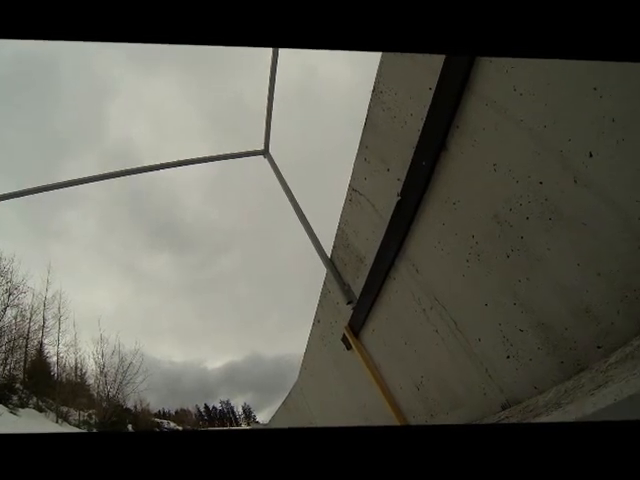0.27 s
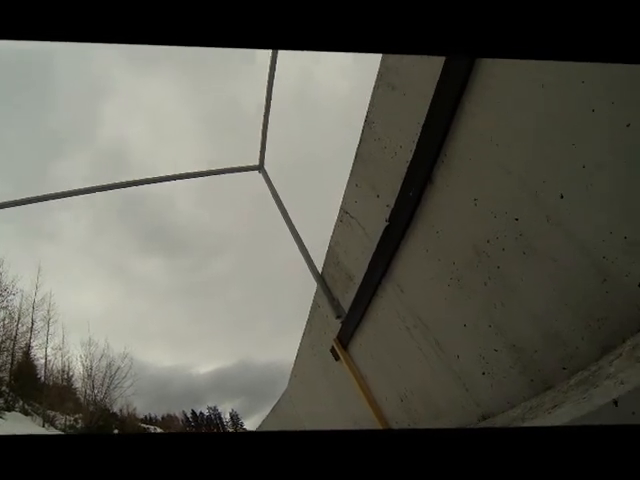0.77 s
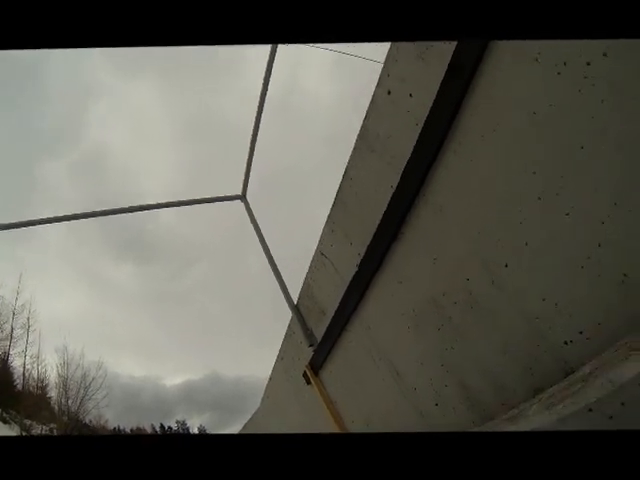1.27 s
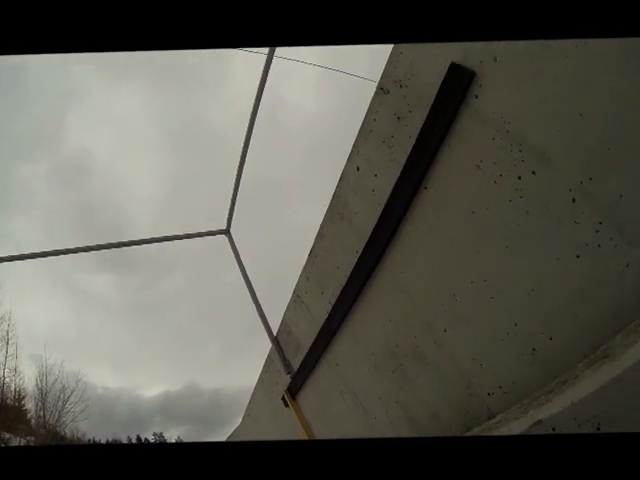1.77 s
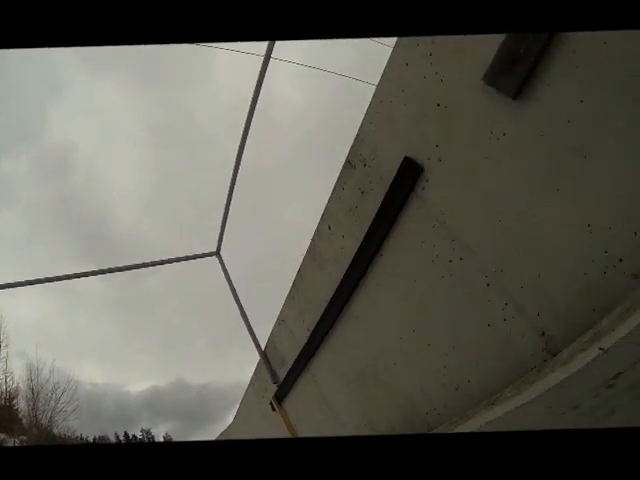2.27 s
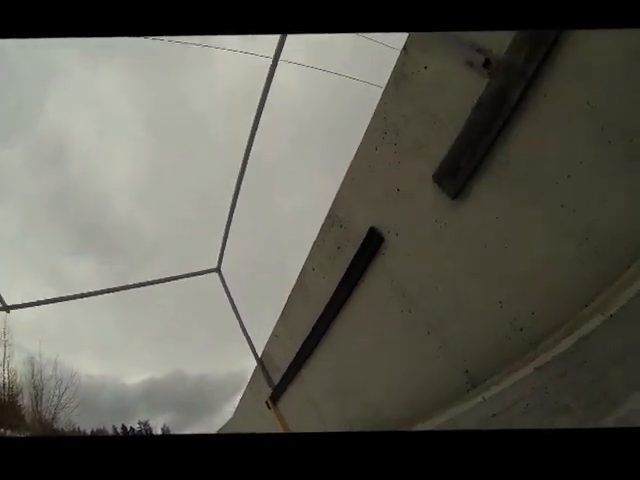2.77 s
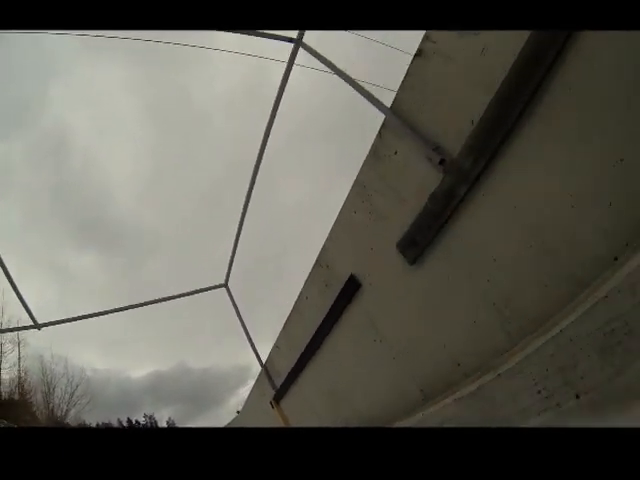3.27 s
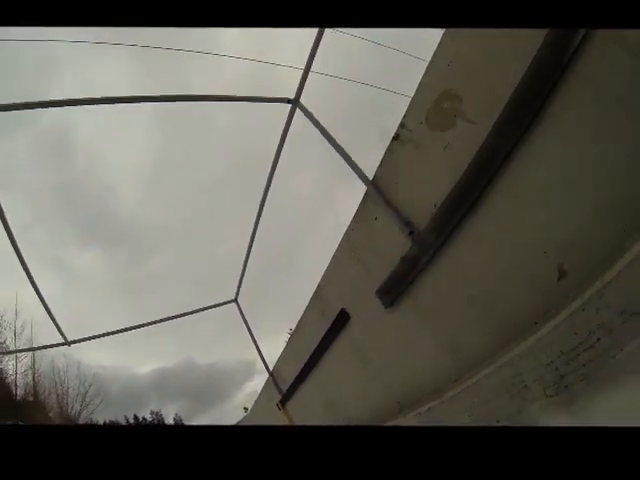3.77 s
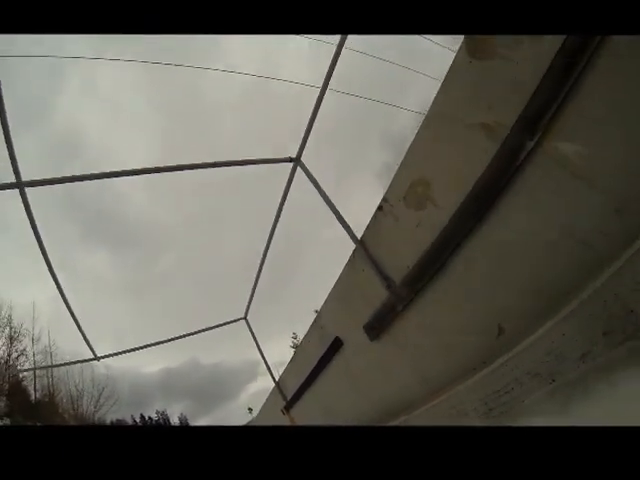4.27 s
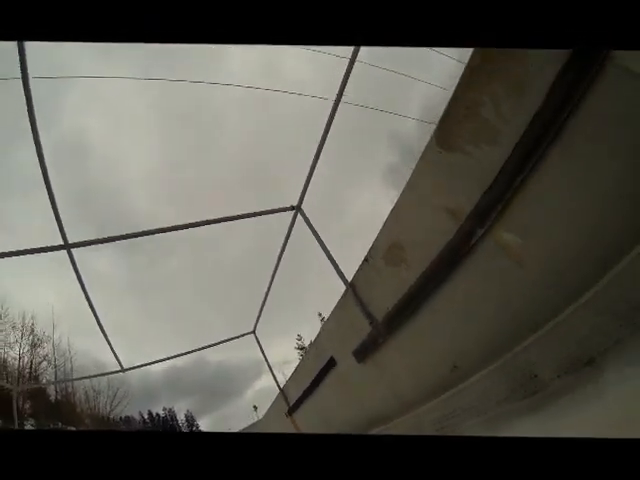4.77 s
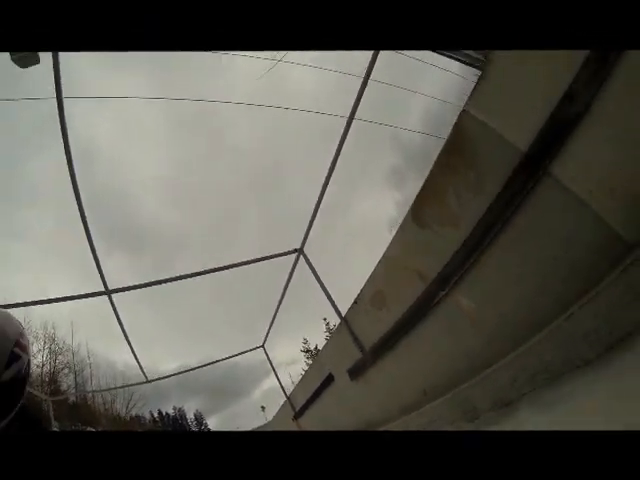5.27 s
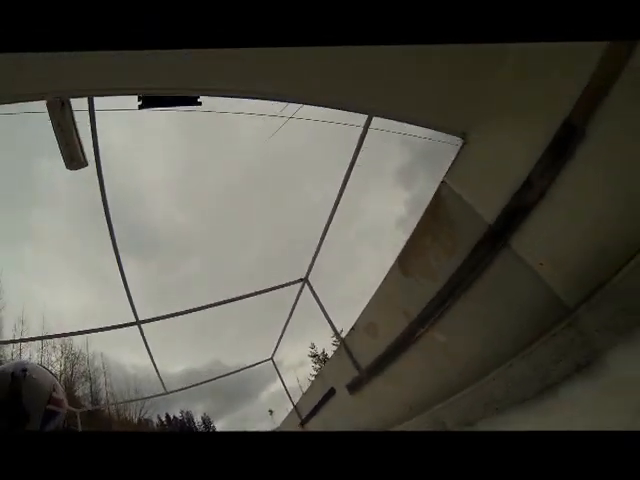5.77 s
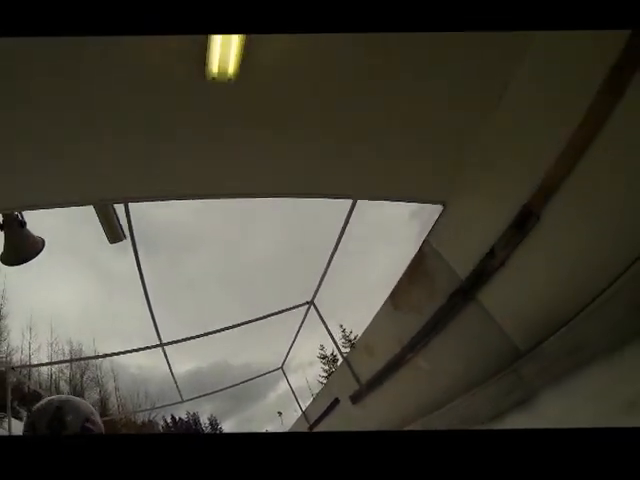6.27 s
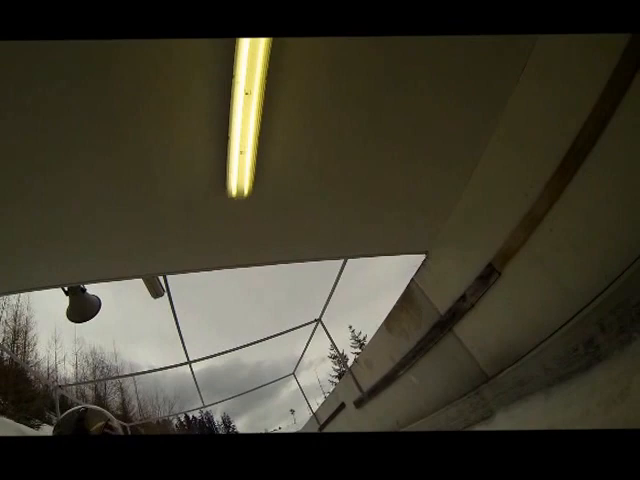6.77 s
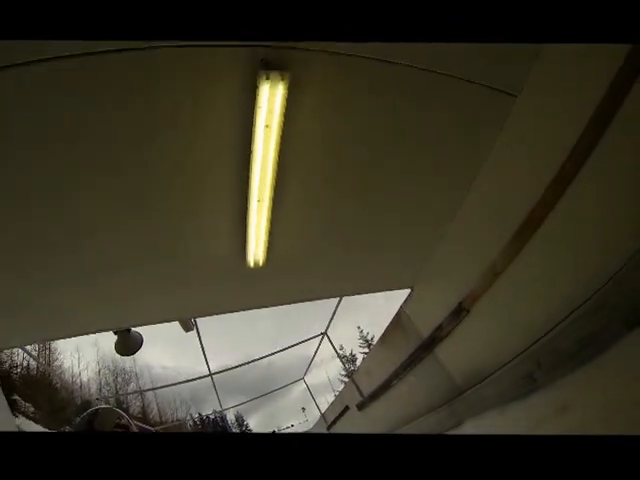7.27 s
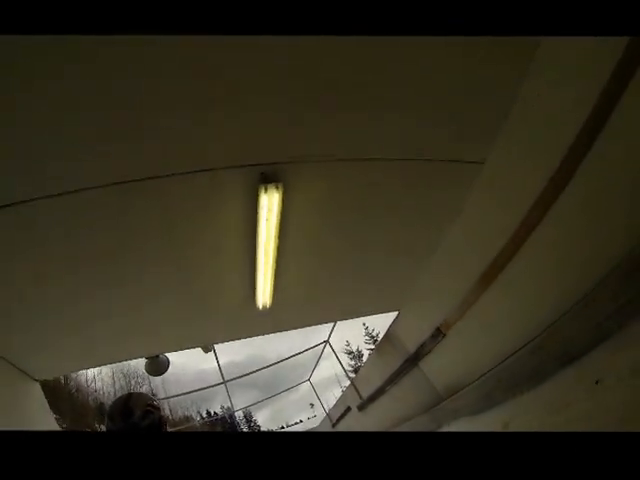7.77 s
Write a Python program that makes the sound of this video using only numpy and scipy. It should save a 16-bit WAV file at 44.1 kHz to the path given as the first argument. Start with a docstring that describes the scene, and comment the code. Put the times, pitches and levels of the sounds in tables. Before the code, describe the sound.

A bobsleigh runs down an ice track, heard from a microphone fixed to the sled. A deep shudder and uneven wind buffeting continue throughout, while rough ice makes the hull drum in quick surges and bumps land as booming thuds. Loose fittings knock irregularly, hardest about a second in and again near the end. Underneath, the steel runners grind and skid quietly, with a few very brief squeals.

```python
"""Riding a bobsleigh

The run down an ice track, heard from a camera fixed to the sled. The chassis shudders, rough
patches and bumps in the ice drum and boom through the hull, and the steel runners grind, skid and
squeal. Loose fittings knock and tick; wind buffets the microphone and whistles thinly past an edge."""
import sys
import numpy as np
from scipy import signal
from scipy.fft import rfft, irfft
from scipy.io import wavfile
from scipy.ndimage import uniform_filter1d

SR = 44100
rng = np.random.default_rng(int(sys.argv[2]) if len(sys.argv) > 2 else 0)


def unload_wav(signal):
    """Save mono or channel-first audio to the path in sys.argv[1] as 16-bit WAV at rate SR, clipped to [-1, 1]."""
    wavfile.write(
        sys.argv[1],
        SR,
        np.round(np.clip(np.atleast_2d(signal).T, -1, 1) * 32767).astype(np.int16),
    )


N = 354255
T = np.arange(N) / SR


def undb(db):
    """Decibels to gain."""
    return 10 ** (np.asarray(db) / 20)


def unit(x):
    """Scale to rms 1."""
    return x / np.sqrt(np.mean(x ** 2))


def even(x, span_s):
    """Hold the short-term rms of x near 1."""
    return x / np.sqrt(uniform_filter1d(x ** 2, int(span_s * SR)) + 1e-12)


def burst(x, db):
    """Scale a short sound so that its energy, spread over 10 ms, has level db."""
    return undb(db) * x / np.sqrt(np.sum(x ** 2) / (SR / 100) + 1e-18)


def add(out, x, start):
    """Mix x in from start, in seconds."""
    i = int(start * SR)
    a, b = max(i, 0), min(i + len(x), N)
    out[a:b] += x[a - i:b - i]


def fader(points):
    """Gain gliding through (seconds, dB) points."""
    times, db = np.transpose(points)
    return undb(np.interp(T, times, db))


def spells(rows, attack_s, release_s, slope_db=0):
    """Gain of (start, length, dB) rows: each rises, holds while changing by slope_db, and dies away."""
    power, t = np.zeros(N), T[:SR]
    for start, length, db in rows:
        attack = np.minimum(t / attack_s, 1)
        hold = undb(db + slope_db * (np.minimum(t / length, 1) - 0.5))
        release = np.exp(-np.maximum(t - length, 0) / release_s)
        add(power, (attack * hold * release) ** 2, start)
    return np.sqrt(power)


def response(spectrum, resonances=(), bright_db=0, size=8192):
    """Causal impulse response of a spectrum with resonances and a treble shelf."""
    f = np.maximum(np.arange(size // 2 + 1) * SR / size, 1)
    hz, db = np.transpose(spectrum)
    shelf = bright_db * f ** 4 / (f ** 4 + 2100. ** 4)
    db = np.interp(np.log(f), np.log(hz), db) + shelf
    for centre, width, lift in resonances:
        db = db + lift / (1 + (2 * (f - centre) / width) ** 2)
    cepstrum = irfft(np.log(undb(db)))
    cepstrum[1:size // 2] *= 2  # fold to minimum phase
    cepstrum[size // 2 + 1:] = 0
    return irfft(np.exp(rfft(cepstrum)))


def through(x, impulse):
    """Pass x through an impulse response."""
    return signal.fftconvolve(x, impulse)[:len(x)]


def noise_band(hz, width_hz, steady):
    """Noise around one pitch; steady (0-1) evens out its swells."""
    f = np.fft.fftfreq(N, 1 / SR)
    band = np.fft.ifft(np.fft.fft(rng.standard_normal(N)) / (1 + ((f - hz) / width_hz) ** 2) ** 2)
    swell = abs(band) / np.mean(abs(band))
    return unit(band.real / (swell ** 2 + 0.1) ** (steady / 2))


def wander(per_s):
    """A glide between random values, per_s of them a second, at rms 1."""
    step = max(int(SR / per_s), 1)
    held = np.repeat(rng.standard_normal(N // step + 1), step)
    return unit(uniform_filter1d(held, step)[:N])


def grains(per_s, spread_db):
    """Random clicks, a few much larger than the rest."""
    size = undb(spread_db * np.minimum(rng.exponential(size=N), 4))
    return (rng.random(N) < per_s / SR) * size * rng.choice([-1, 1], N)


# Spells of thin whistle. Each row: start in seconds, length in seconds, level in dB.
WHISTLE_SPELLS = [(-.1, 0.81, -78.5), (1.75, .57, -82), (3.22, 0.41, -77.5), (4.35, .12, -80),
                  (5.85, 0.33, -85.5), (6.35, .25, -78)]

def wind_whistle():
    """Air sings past a small edge, in spells over a faint trace that never stops."""
    blowing = np.hypot(undb(-88.5), spells(WHISTLE_SPELLS, attack_s=0.12, release_s=0.04))
    return undb(1.5) * noise_band(10670, width_hz=100, steady=0.3) * blowing


def wind_buffet():
    """Wind beats on the microphone with a deep, uneven flutter."""
    return undb(-25.5) * noise_band(30, width_hz=40, steady=0) * undb(2 * wander(4.3))


# The crisp tone of a crackle. Each row: frequency in Hz, level in dB.
CRACKLE_EQ = [(2000, -34), (4500, -17), (6200, 0), (8500, -9.5), (10000, -12), (12500, -7.5), (15000, -32)]
# Showers of crackles. Each row: start in seconds, length in seconds, level in dB.
CRACKLE_SHOWERS = [(.98, .11, -61.5), (1.12, 0.084, -63.5), (5.38, 0.017, -56), (6.872, 0.01, -58.5),
                   (7.44, 0.0094, -55), (7.565, 0.047, -61)]

def crackles():
    """Showers of tiny, bright clicks."""
    clicks = through(grains(per_s=360, spread_db=3.5), response(CRACKLE_EQ))
    return even(clicks, span_s=0.02) * spells(CRACKLE_SHOWERS, attack_s=0.002, release_s=0.002)


# Resonances of the shell and camera housing. Each row: centre in Hz, width in Hz, boost or cut in dB.
SHELL_RESONANCES = [(646, 88, 6), (800, 110, 10), (1050, 42, 4.5), (1320, 120, 4.5), (1485, 37, 4),
                    (1570, 19, 3), (1692, 260, 6), (2770, 120, -1), (2590, 64, 2.5), (3110, 64, -2.5),
                    (3540, 100, 3.5), (4480, 650, 1.5), (5130, 1300, 4.5), (6740, 300, -2), (7940, 2200, 5)]

def shell(x, eq, bright_db=0):
    """A contact with its own tone, eq, is coloured by the shell and housing."""
    return through(x, response(eq, SHELL_RESONANCES, bright_db))


def panel_ring(x, ring_s=0.009, ring_db=-7):
    """The shell's many small modes add a short, grainy ring."""
    t = T[:SR // 10]
    tail = rng.standard_normal(len(t)) * np.exp(-t / ring_s)
    return x + undb(ring_db) * through(x, tail / np.sqrt(np.sum(tail ** 2)))


# The dry tone of the camera mount. Each row: frequency in Hz, level in dB.
MOUNT_EQ = [(400, -4.5), (1200, -0.5), (2600, 2), (4000, -2.5), (6000, -5.5), (8000, -15), (12000, -19.5),
            (15000, -27)]

def mount_chafing(swing, rough, slack=0.42):
    """The mount chafes at the crests of the hull's widest swings and ticks more often on rough ice."""
    pressure = np.clip(abs(swing) - slack, 0, slack)
    rub = unit(grains(per_s=5500, spread_db=3)) * pressure
    rub *= undb(4 * np.clip(wander(97), -2, 2))
    shake = rough / np.mean(rough)
    ticks = unit(grains(per_s=45 * shake, spread_db=3.6))
    return undb(-64) * unit(shell(rub, MOUNT_EQ)) + undb(-70) * unit(shell(ticks, MOUNT_EQ))


def faint_knocks(count=120, per_s=8.3, db=-47.5, spread_db=6.5, contact_ms=3.3):
    """Faint knocks at random moments, as rows like those of the loud ones."""
    waits, sizes, lengths = rng.random((count, 3)).T
    starts = np.cumsum(-np.log(1 - waits) / per_s)
    return [(start, db + spread_db * (2 * size - 1), contact_ms * (0.5 + length), 0)
            for start, size, length in zip(starts, sizes, lengths) if start < T[-1]]


# The thick tone of a knock. Each row: frequency in Hz, level in dB.
KNOCK_EQ = [(100, 14), (400, -4.5), (650, -8), (1100, -2.5), (1600, 3.5), (2100, -9), (2700, -5),
            (4000, -22), (6000, -37), (9000, -47.5), (15000, -62.5)]
# Loud knocks, with two brief runner scrapes (4.36 s and 6.21 s) among them. Each row: start in seconds, level
# over 10 ms in dB, contact time in ms, brightness in dB.
LOUD_KNOCKS = [(0.028, -33.5, 1.7, 1), (.23, -35.5, 5.2, -4), (.275, -23.5, 6.7, 1.5),
               (0.337, -33, 6.5, -2), (0.404, -33, 7.4, -4), (.432, -33, 10.4, 15), (0.697, -29.5, 4.6, 1),
               (1.0292, -15.5, 2, 25.5), (1.032, -20, 1.2, -2), (1.126, -26.5, 9, -11.5),
               (1.745, -33.5, 8.1, -11), (1.962, -25, 6.6, -0.5), (2.047, -35.5, 7.1, 1),
               (2.086, -29, 13, -2.5), (2.328, -35, 5, 0), (2.351, -25, 5.9, -12), (2.654, -36.5, 2.6, -3),
               (2.706, -39, 2.8, 7), (3.11, -23.5, 8.1, -7), (3.5, -35.5, 18, 17), (3.613, -32.5, 5.8, -3),
               (3.914, -36.5, 1.5, 14.5), (4.141, -31.5, 2.3, -7.5), (4.16, -37, 3.2, 2),
               (4.36, -38, 11, 10), (4.866, -42, 5.7, 12), (5.349, -23.5, 3.8, -24),
               (5.372, -20.5, 4.7, 3.5), (5.379, -22.5, 4.5, 4), (5.807, -39.5, 1.4, 2),
               (5.88, -35.5, 4.1, 0), (5.915, -27, 4, 5.5), (6.183, -35.5, 3, -9),
               (6.209, -27.5, 15.6, -10), (6.367, -46, 4.4, -4), (6.473, -35, 7.7, 18),
               (6.618, -27, 2.1, -4.5), (7.149, -46, 0.67, 15.5), (7.36, -34.5, 2.5, 3),
               (7.384, -15.5, 5.8, -9.5), (7.422, -24.5, 4, -15), (7.442, -21.5, 4.5, -4.5),
               (7.565, -22.5, 1.5, -5), (7.578, -25, 3.6, 7.5), (7.632, -27.5, 6.6, -3.5),
               (7.702, -38, 7.8, 1)]

def loose_fittings(rise_ms=0.024, strike_db=17):
    """A loose part strikes, then chatters for a few milliseconds; some knocks are dull, others bright. The
    long-contact rows at 4.36 s and 6.21 s are brief scrapes of a runner, played the same way."""
    out, t = np.zeros(N), T[:SR // 8]
    strike = undb(strike_db) * (t == 0)
    rise = 1 - np.exp(-t / (rise_ms / 1000))
    for start, db, contact_ms, bright_db in LOUD_KNOCKS + faint_knocks():
        pressure = rise * np.exp(-(t / (contact_ms / 1000)) ** 2 / 2)
        chatter = rng.standard_normal(len(t)) * pressure
        add(out, burst(shell(strike + chatter, KNOCK_EQ, bright_db), db), start)
    return out


# Steel squeals. Each row: peak time in seconds, pitch in Hz, level in dB, rise in ms, decay in ms.
RUNNER_SQUEALS = [(1.89, 1573, -39.5, 26, 39), (1.966, 1670, -14.5, 2, 4.8), (1.977, 2050, -36, 6, 22),
                  (1.977, 1588, -30.5, 3.3, 24), (4.372, 1598, -31.5, 9.8, 13.5),
                  (4.499, 1570, -36.5, 4, 31), (5.916, 1350, -25.5, 2.9, 5.4), (6.069, 1280, -33.5, 3.4, 6),
                  (6.473, 1584, -34.5, 3, 21), (6.495, 1860, -40, 14, 36), (6.746, 1303, -35.5, 32, 25)]

def runner_squeals():
    """A runner catches on the ice and sings briefly at an unsteady pitch."""
    out, t = np.zeros(N), T[:SR // 2] - 0.1
    for peak_s, hz, db, rise_ms, decay_ms in RUNNER_SQUEALS:
        swell = np.exp(-np.where(t < 0, (t / (rise_ms / 1000)) ** 2, t / (decay_ms / 1000)))
        pitch = hz * (1 + 0.038 * wander(700)[:len(t)])
        flutter = undb(0.83 * wander(230)[:len(t)])
        tone = unit(np.sin(2 * np.pi * np.cumsum(pitch) / SR) * flutter)
        add(out, undb(db) * swell * tone, peak_s + t[0])
    return out


# The rise and fall of the sub-bass shudder. Each row: time in seconds, level in dB.
SHUDDER_LEVELS = [(0.0, -20.5), (0.49, -38.5), (0.74, -12.5), (0.96, -25), (1.38, -16.5), (2.5, -23),
                  (2.7, -41), (2.75, -15.5), (2.91, -31), (3.06, -17.5), (3.24, -39), (3.38, -14.5),
                  (3.49, -18.5), (3.89, -17.5), (3.98, -34), (4.09, -17.5), (4.23, -29), (5.05, -14.5),
                  (5.57, -25.5), (5.61, -18.5), (7.09, -20.5), (7.13, -12.5), (7.96, -29), (8.03, -13.5)]

def chassis_shudder(hz=35.1, waver_hz=2.503):
    """The chassis bounces on its suspension at its own slow, wavering rate."""
    phase = 2 * np.pi * np.cumsum(hz + waver_hz * wander(11)) / SR
    bounce = unit(np.sin(phase) * undb(1.5 * wander(22)))
    return undb(-0.1) * bounce * fader(SHUDDER_LEVELS)


# The booming modes of the hull. Each row: pitch in Hz, width in Hz, level in dB.
HULL_MODES = [(109, 8.5, -9), (158.4, 11.4, 13.5), (198, 66, -15), (229, 6.1, -9), (238, 25, -9),
              (280, 56, -18.5)]

def hull_boom(force):
    """A force rings the hull's modes; the narrow ones last longest."""
    t = T[:SR // 2]
    ring = sum(undb(db) * np.exp(-np.pi * width * t) * np.sin(2 * np.pi * hz * t)
               for hz, width, db in HULL_MODES)
    return through(force, ring)


# Bumps in the ice. Each row: peak time in seconds, level in dB, push time in ms, send to the boom in dB.
ICE_BUMPS = [(0.12, -10, 1.5, 3), (0.711, -14, 3.5, -1), (1.019, -10, 1.9, -24), (1.972, -7.5, 4.8, -14),
             (2.104, -9, 2.5, -14), (2.16, -12.5, 1.5, 10), (2.353, -5, 1.52, -16.5),
             (2.361, -2, 1.9, -11.5), (2.548, -4, 2, -17.5), (2.617, -13.5, 1.9, 0.5),
             (2.746, -11, 3.7, -11.5), (2.836, -2.5, 2, 0), (3.116, -7.5, 2.5, -14),
             (3.127, -14.5, 2.4, 5.5), (3.693, -2.5, 1.92, -18), (3.913, 0, 2.1, -13.5),
             (4.141, -10, 1.9, -1.5), (4.16, -3, 1.7, -4.5), (4.464, -9, 1.41, 5.5), (4.52, -11, 3.8, 3),
             (4.62, -9, 1.7, 0.5), (5.351, -0.5, 1.75, -18), (5.382, -7, 1.5, 3.5), (5.559, -12, 1.5, 8),
             (5.931, -7, 2.1, -10), (6.208, -13.5, 1, 13.5), (6.623, -10.5, 1.41, -7),
             (6.762, -7.5, 1.5, 5), (6.813, -11, 1.6, -6.5), (6.882, -4.5, 2.3, -40),
             (7.256, -12.5, 1.52, 6.5), (7.557, -0.5, 2.1, -17.5), (7.573, -7, 1.4, -5.5),
             (7.85, -9, 1.6, 4)]

def ice_bumps(tick_db=-44):
    """Each bump heaves the hull out and back, leaves it booming and makes the camera mount tick."""
    heave, blows, ticks = np.zeros((3, N))
    t = T[:SR // 20] - 0.025
    for peak_s, db, push_ms, boom_db in ICE_BUMPS:
        start = peak_s + t[0]
        u = t / (push_ms / 1000)
        push = undb(db) * (1 - u ** 2) * np.exp(-u ** 2 / 2)
        add(heave, push, start)
        add(blows, undb(boom_db) * push, start)
        chatter = rng.standard_normal(len(t)) ** 3 * np.exp(-abs(t) / 0.0011)
        add(ticks, burst(shell(chatter, MOUNT_EQ), db + tick_db), start)
    return undb(0.5) * heave + undb(-58) * hull_boom(blows) + ticks


# Rough ice. Each row: start in seconds, length in seconds, hull drumming in dB, runner grinding in dB.
ROUGH_PATCHES = [(0, 0.039, -22.5, -64), (0.086, .11, -20.5, -47.5), (0.247, 0.11, -27, -44.5),
                 (0.349, 0.11, -34, -46), (0.634, 0.13, -25, -41), (0.801, 0.22, -18, -60),
                 (1.076, 0.18, -17.5, -46.5), (1.283, 0.21, -21.5, -47), (1.537, 0.047, -24.5, -48),
                 (1.656, 0.062, -30.5, -48), (1.903, 0.098, -21, -48), (2.05, 0.15, -23, -45.5),
                 (2.289, 0.11, -22.5, -50.5), (2.517, .14, -18.5, -52), (2.72, 0.12, -19, -42),
                 (3.085, 0.078, -16.5, -51), (3.2, 0.358, -29, -44.5), (3.617, .075, -20, -39.5),
                 (3.69, 0.088, -26.5, -68), (3.885, 0.067, -23.5, -50), (4.074, 0.12, -18, -43),
                 (4.426, 0.21, -20, -47.5), (4.67, 0.22, -21, -49), (4.997, 0.07, -24.5, -51.5),
                 (5.128, 0.065, -32, -50), (5.314, 0.084, -23, -46.5), (5.455, 0.034, -35, -50),
                 (5.526, 0.089, -19, -46), (5.745, 0.072, -20.5, -50.5), (5.86, 0.084, -22, -53.5),
                 (6.024, 0.21, -20, -46), (6.342, 0.032, -26, -64), (6.579, 0.3, -18.5, -44),
                 (6.977, .06, -19.5, -44), (7.07, .08, -32.5, -55.5), (7.233, .1, -23.5, -56),
                 (7.442, 0.15, -18, -54), (7.633, 0.042, -32, -48), (7.828, 0.038, -18.5, -61)]

def rough_ice(attack_s=0.017, slope_db=1.5, smooth_ice_db=-32):
    """Two gains: how hard the ice shakes the sled (always a little), and how its rough patches grind."""
    drum_rows = [(start, length, db) for start, length, db, _ in ROUGH_PATCHES]
    grind_rows = [(start, length, db) for start, length, _, db in ROUGH_PATCHES]
    drum = spells(drum_rows, attack_s, release_s=0.033, slope_db=slope_db)
    grind = spells(grind_rows, attack_s, release_s=0.0088, slope_db=slope_db)
    return np.hypot(undb(smooth_ice_db), drum), grind


# The dark tone of the rumble. Each row: frequency in Hz, level in dB.
RUMBLE_EQ = [(30, -16), (62, 0), (92, 1), (125, 1), (165, 0.5), (200, -6), (260, -8), (320, -21),
             (420, -32.5), (600, -33), (1200, -53), (4000, -86.5)]

def hull_drumming(rough):
    """Rough ice shakes the sled with a broad rumble, which keeps the hull booming."""
    rumble, shaking = (unit(through(rng.standard_normal(N), response(RUMBLE_EQ))) for _ in range(2))
    boom = even(hull_boom(shaking), span_s=0.11)
    return undb(-0.5) * even(rumble + undb(4) * boom, span_s=0.06) * rough


# The tones of the gritty scrape and the brighter spray. Each row: frequency in Hz, level in dB.
SCRAPE_EQ = [(150, 9), (400, -14.5), (700, -8.5), (1100, -0.5), (1450, 6), (1750, -2), (2050, -13.5),
             (3000, -28), (5000, -57.5), (15000, -55)]
SPRAY_EQ = [(800, -19), (1600, 3.5), (2200, 2), (2900, 5), (3900, -6.5), (5000, -12.5), (6300, -15.5),
            (8000, -22), (10000, -25), (14000, -32)]
# The bed of grinding between rough patches. Each row: time in seconds, level in dB.
GLIDE_LEVELS = [(0, -47), (.2, -50), (.55, -44.5), (1.3, -49), (1.8, -55), (2.45, -59), (3, -57),
                (4.3, -54), (5.4, -59.5), (6.4, -53), (7.2, -52.5), (7.55, -41.5), (7.75, -55.5),
                (8.03, -51)]
# Skids swell until the runners grip. Each row: start in seconds, length in seconds, spray level in dB.
RUNNER_SKIDS = [(.08, 0.065, -53.5), (.26, 0.15, -48.5), (.6, 0.26, -58.5), (1.87, 0.11, -50.5),
                (2.25, 0.034, -52), (2.69, 0.11, -54.5), (2.99, 0.12, -60), (3.34, 0.18, -46.5),
                (3.55, 0.095, -51), (3.82, 0.076, -52.5), (4.09, 0.049, -63), (4.34, .04, -45),
                (6, 0.073, -54), (6.45, 0.058, -47.5), (6.53, 0.22, -54), (7.29, 0.068, -52.5),
                (7.51, 0.098, -53), (7.9, 0.12, -55.5)]

def runners(patch_grind):
    """Steel grinds over ice grains and rings the shell, louder on rough patches; skids add spray."""
    grinding = np.hypot(fader(GLIDE_LEVELS), patch_grind)
    skidding = spells(RUNNER_SKIDS, attack_s=0.015, release_s=0.015, slope_db=6)
    light_spray = np.hypot(undb(-13) * grinding, undb(-69.5))  # follows the grinding, never stops
    spraying = np.hypot(skidding, light_spray)
    judder = undb(2.36 * wander(130))
    coarse = panel_ring(grains(per_s=2500, spread_db=2.5) * judder)
    fine = panel_ring(grains(per_s=4000, spread_db=3.4) * judder)
    scrape = undb(3) * even(shell(coarse, SCRAPE_EQ), span_s=0.11) * grinding
    spray = undb(1.57) * even(shell(fine, SPRAY_EQ), span_s=0.13) * spraying
    return undb(0.5 * wander(60)) * (scrape + spray)


def scene():
    """Everything rides with the sled and reaches one microphone."""
    rough, patch_grind = rough_ice()
    hull = hull_drumming(rough) + ice_bumps()
    low_end = hull + chassis_shudder() + wind_buffet()
    grit = mount_chafing(hull, rough) + runners(patch_grind) + crackles()
    return (low_end + grit + loose_fittings() + runner_squeals() + wind_whistle())[None]


def record(dry, top_hz=15500):
    """The camera rounds the highest peaks and cuts the top."""
    rounded = dry / (1 + dry ** 8) ** (1 / 8)
    return signal.sosfilt(signal.ellip(8, 0.2, 70, top_hz, fs=SR, output="sos"), rounded)


dry = scene()
out = record(dry)
unload_wav(out)
```